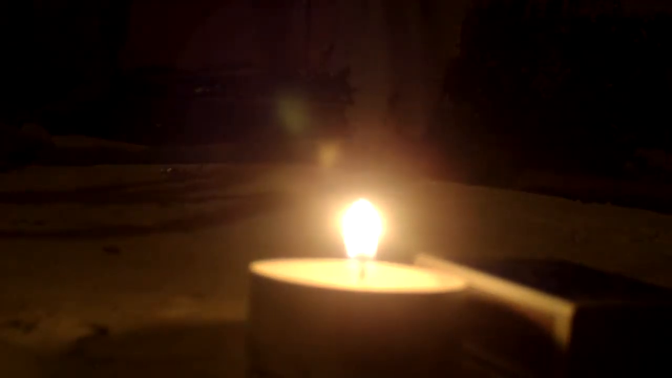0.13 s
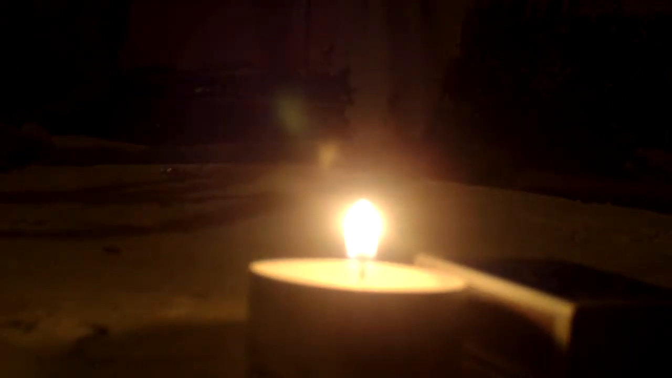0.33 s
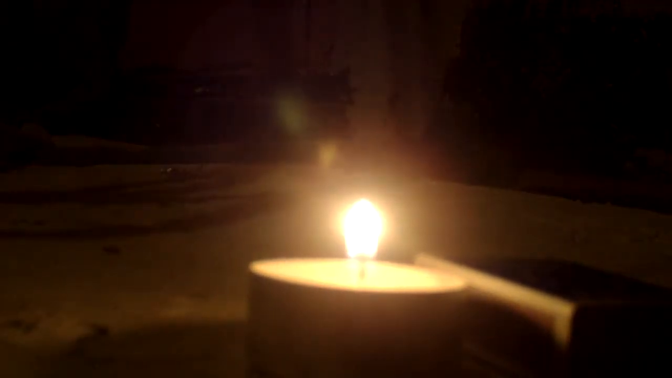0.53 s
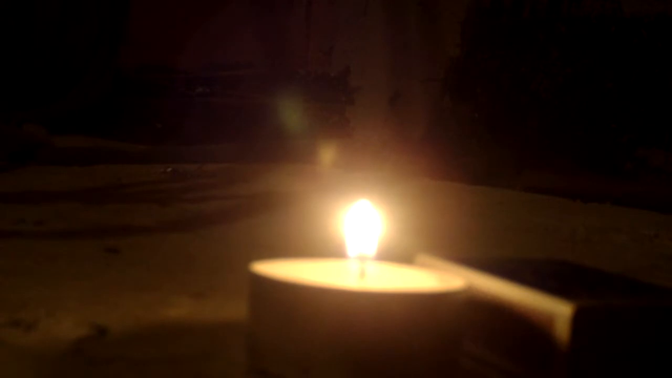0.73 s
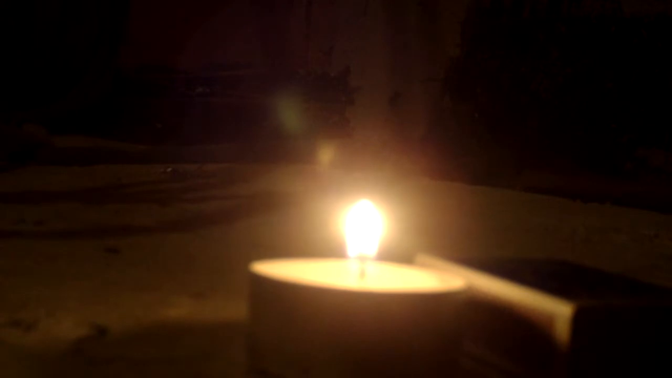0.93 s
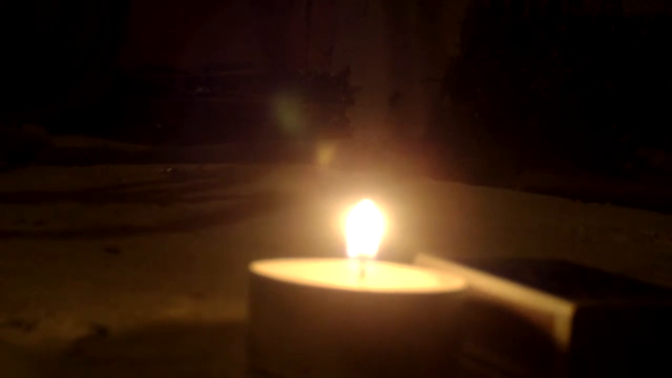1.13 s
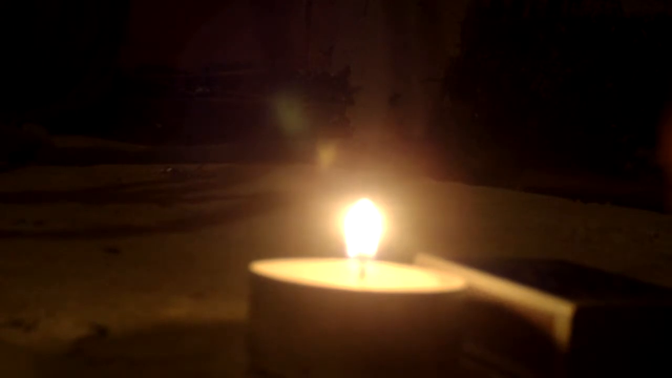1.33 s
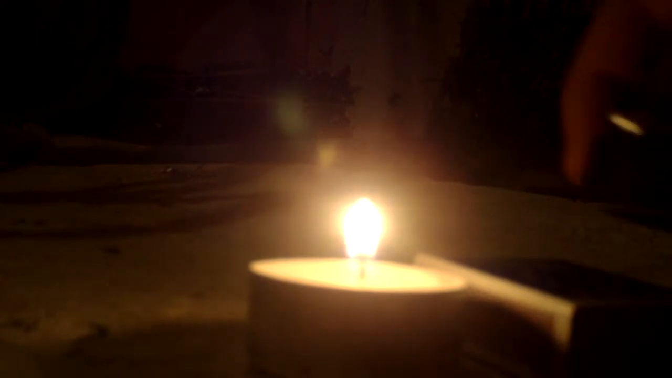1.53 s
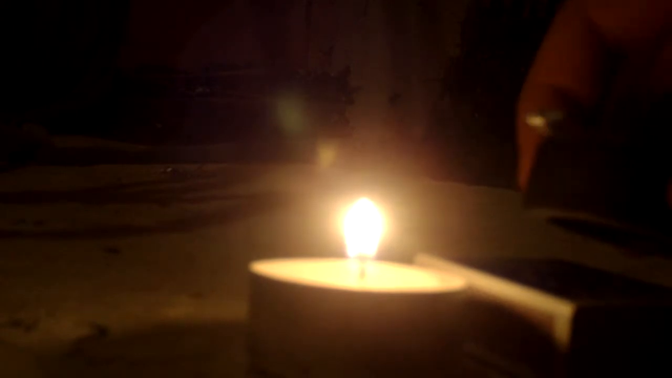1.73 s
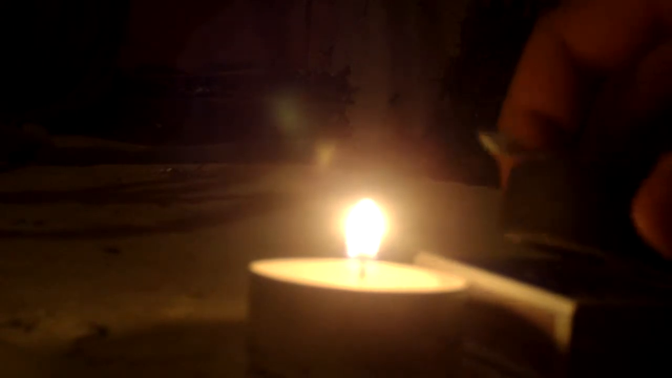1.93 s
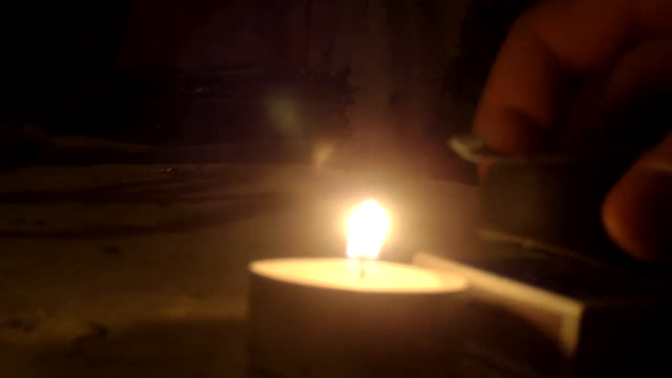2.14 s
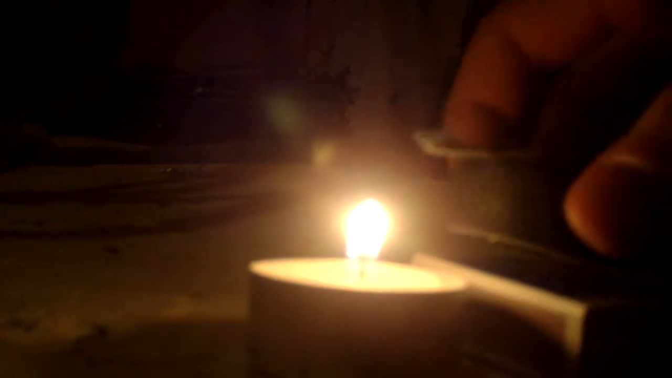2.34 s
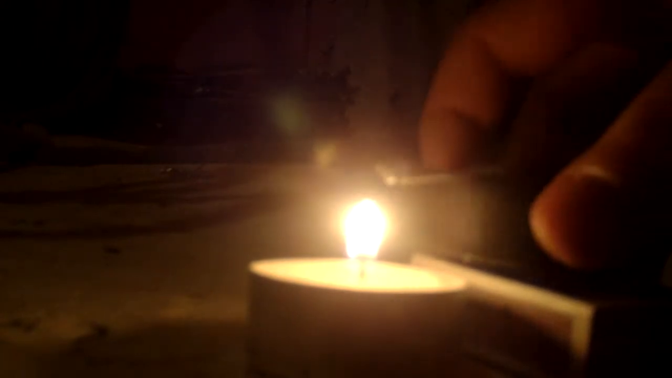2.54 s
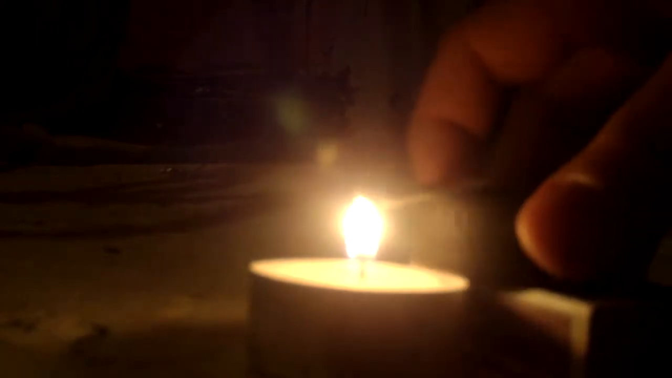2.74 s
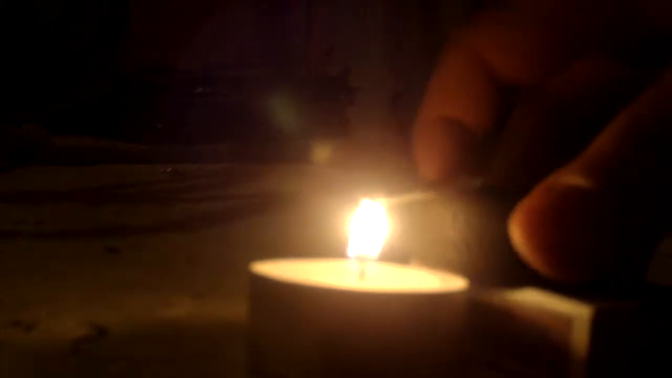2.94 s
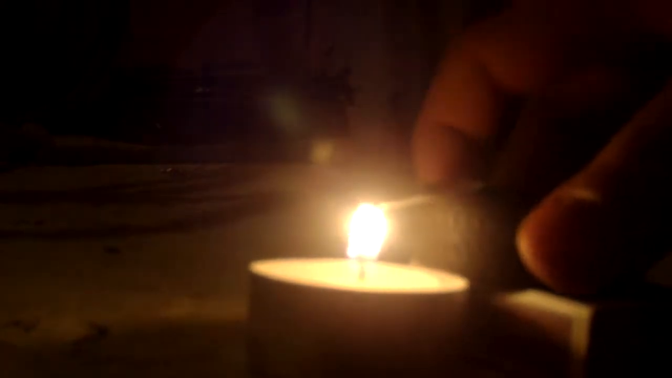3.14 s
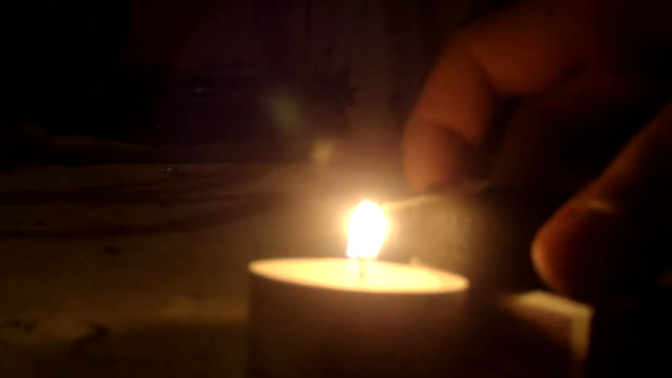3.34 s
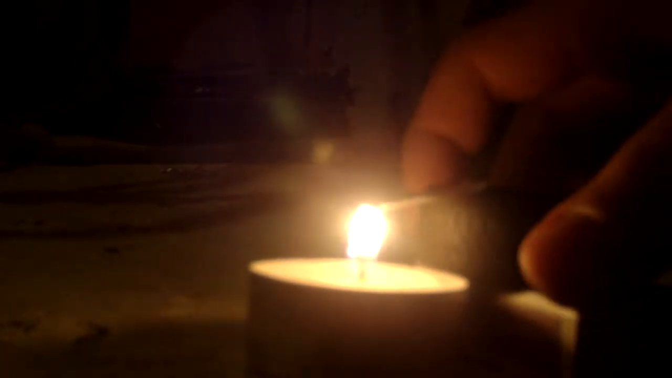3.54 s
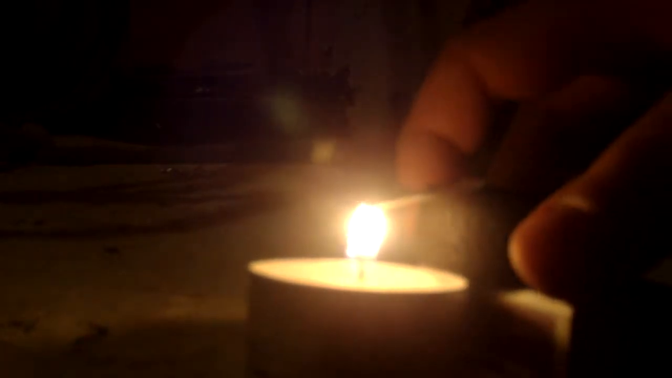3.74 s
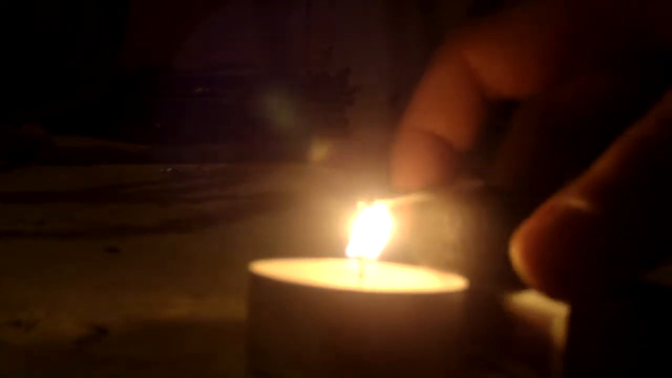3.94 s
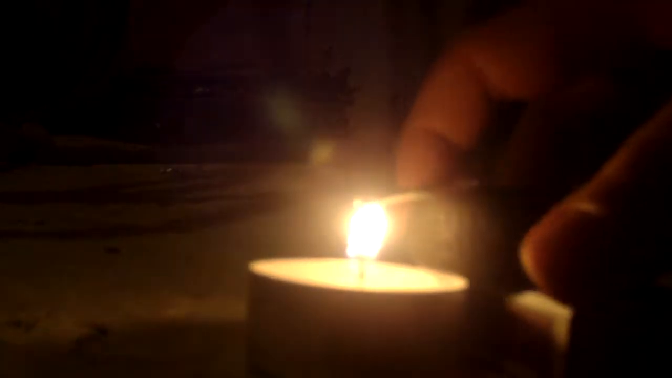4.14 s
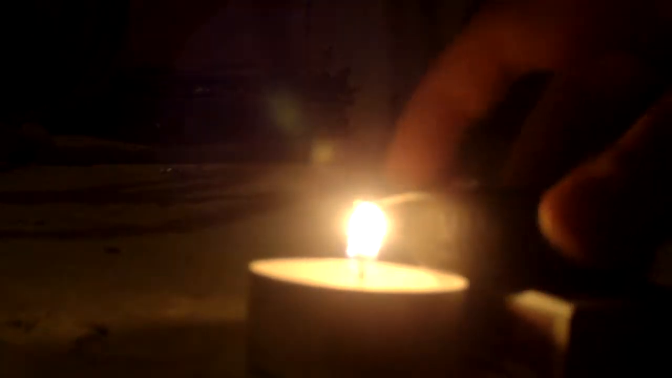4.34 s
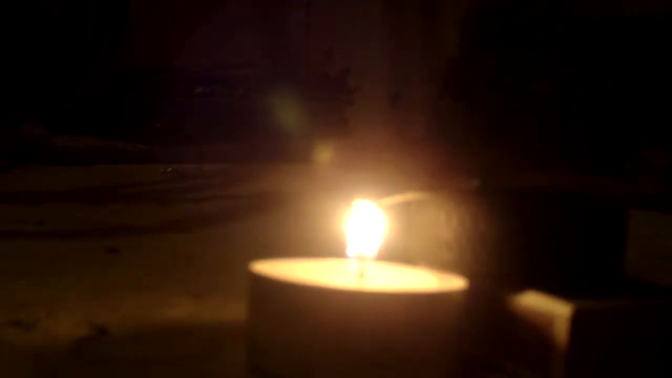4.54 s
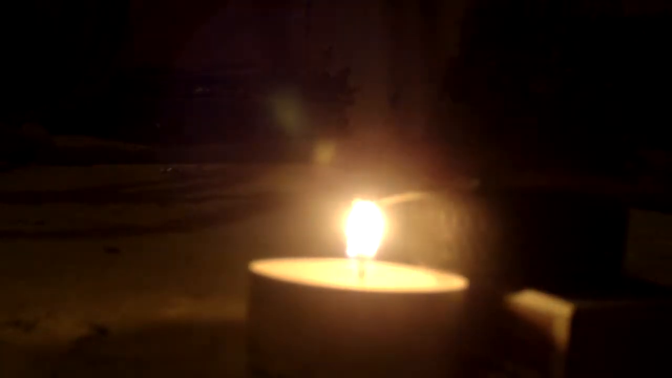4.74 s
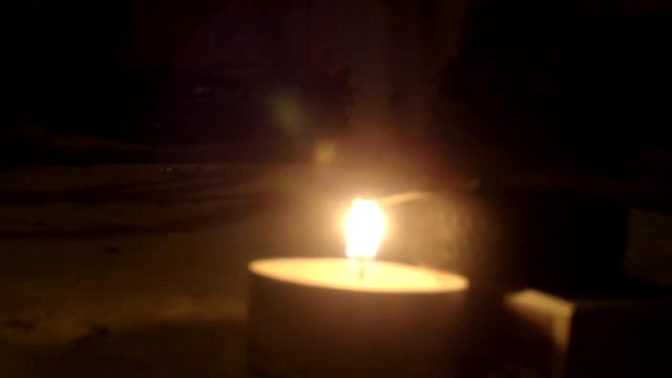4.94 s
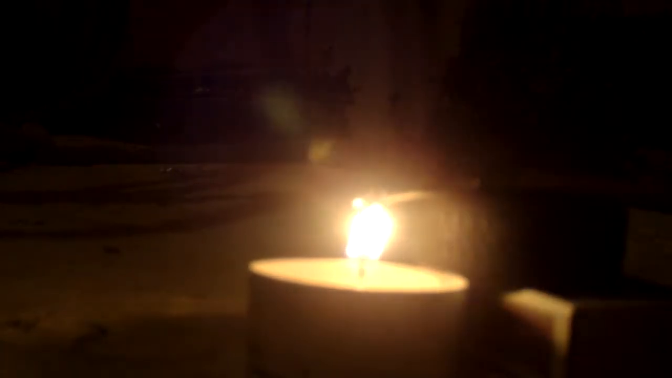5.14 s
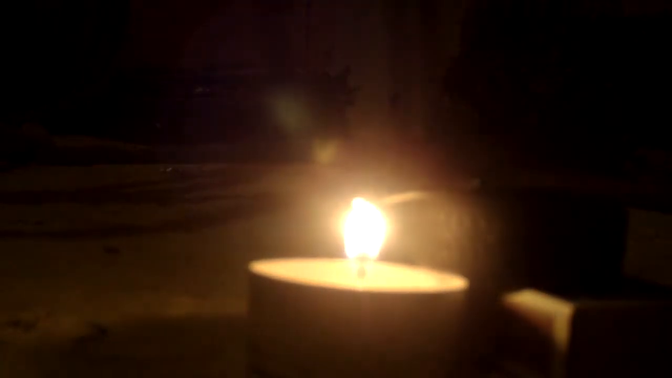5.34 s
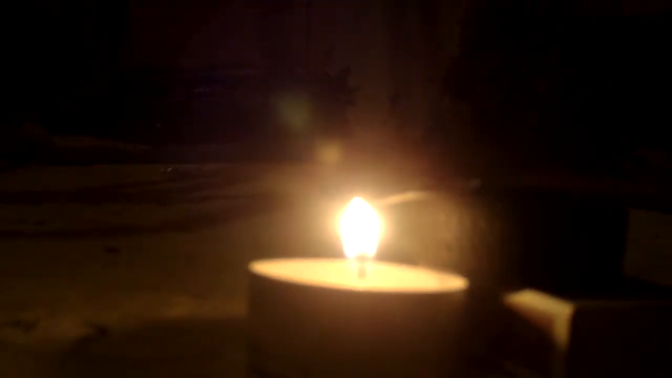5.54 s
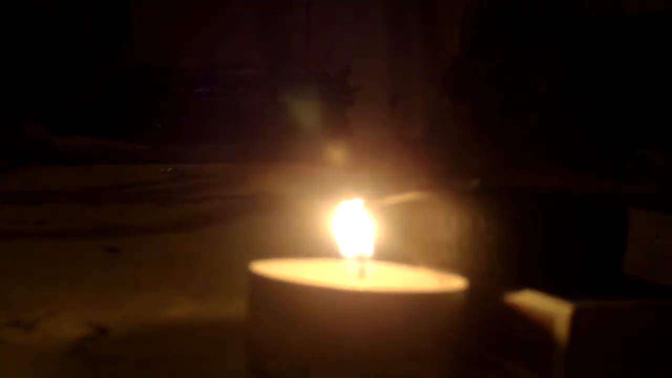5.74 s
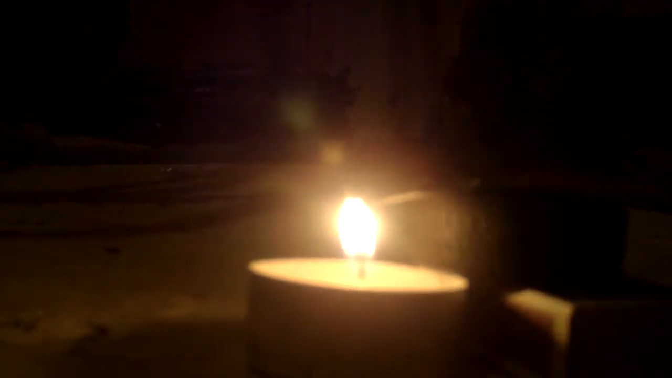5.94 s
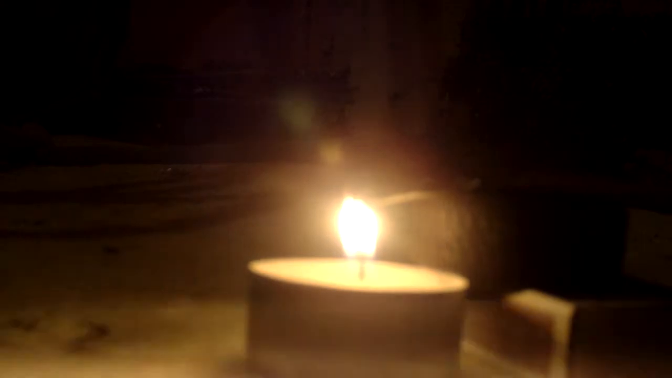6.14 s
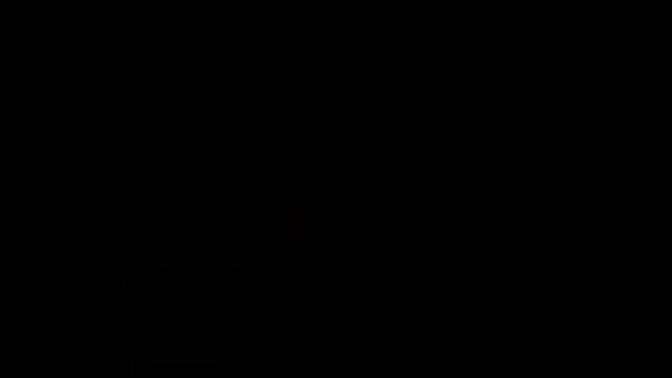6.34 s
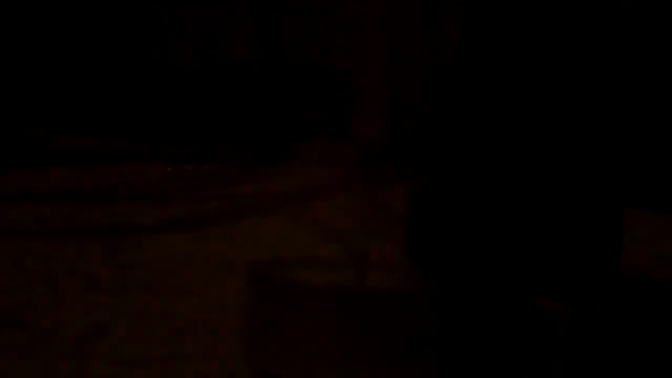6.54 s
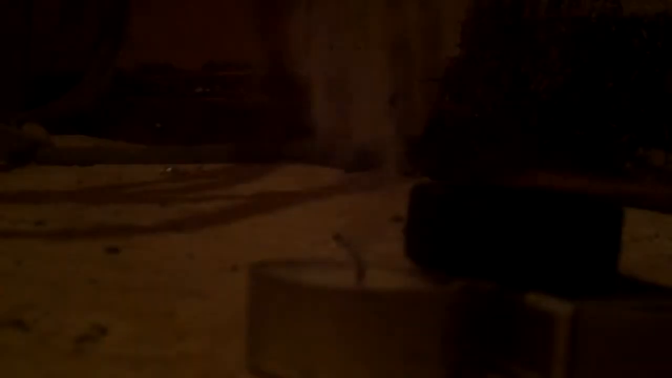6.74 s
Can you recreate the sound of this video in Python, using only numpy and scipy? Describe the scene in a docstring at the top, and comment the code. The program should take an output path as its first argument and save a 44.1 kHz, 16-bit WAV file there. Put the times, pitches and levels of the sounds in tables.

```python
"""In a small room, a match firecracker on a small box is pushed across a table into a candle flame.
Fingers rustle and tick, and the box scrapes by stick-slip friction. Someone backs away with swishing
clothes, and a few knocks excite the modes of wooden furniture and floor. Feet shuffle, then the
firecracker bursts with a bang that overloads the microphone; grit patters down. Beneath it all lie
room rumble, hiss, two draughts and a faint motor hum."""
import sys
import numpy as np
from scipy import signal
from scipy.io import wavfile
from scipy.ndimage import uniform_filter1d

SR = 44100
rng = np.random.default_rng(int(sys.argv[2]) if len(sys.argv) > 2 else 0)


def generate_wav(sig):
    """Save sig (samples, or channels by samples) to the path in sys.argv[1] as 16-bit PCM at SR."""
    pcm = np.round(np.clip(np.atleast_2d(sig).T, -1, 1) * 32767).astype(np.int16)
    wavfile.write(sys.argv[1], SR, pcm)


N = 303400

# Wall echoes of the bang: (frequency [Hz], decay by 60 dB [s])
ECHO_T60 = [(100, 0.16), (1000, 0.18), (2200, 0.2), (5000, .18), (8000, 0.14), (15000, 0.12)]
# Fingers and sleeve brushing: (peak time [s], duration [s], level [dB], tilt [dB/octave])
RUSTLES = [(0.254, 0.027, -50.5, -3.5), (0.331, 0.064, -48.5, -3), (0.769, .1, -60.5, -3.5),
           (1.031, .015, -42, -1.5), (1.069, .033, -44, -1), (1.165, .026, -50, -2), (1.261, .155, -47, -2),
           (1.363, .076, -43, 0), (2.247, .075, -55, 0), (3.702, 0.098, -48.5, .8),
           (3.84, .086, -48.5, 1.2), (4.398, 0.15, -62, -0.5), (4.566, 0.027, -48, 3),
           (5.091, .2, -47.5, 3), (5.168, 0.025, -27.5, -0.5)]
# The box gliding over the table: (time [s], level [dB])
SLIDE_ENVELOPE = [(2.31, -69), (2.42, -49.5), (2.48, -59), (2.51, -50.5), (2.56, -58.5), (2.65, -44.5),
                  (2.685, -51.5), (2.77, -53), (2.85, -74)]
# Nudges of the box: (peak time [s], duration [s], level [dB], spacing of after-slips [s])
NUDGES = [(2.178, 0.013, -52, 0.066), (2.889, .07, -56, .08), (2.979, 0.098, -52.5, 0.096),
          (3.126, 0.067, -51, .09), (3.311, 0.027, -52.5, 0.059), (3.574, .07, -60, 0.13),
          (4.004, .017, -46.5, .103), (4.034, .06, -48, .12)]
# Resonances of the box: (frequency [Hz], width [Hz], level [dB])
BOX_MODES = [(840, 410, -6), (1504, 500, 2), (2330, 610, -7.5), (4260, 1560, 0), (6620, 530, -2),
             (7550, 1900, -0.5), (9900, 870, -11), (11400, 700, -10)]
# Sharp little ticks: (time [s], peak level [dB], tilt [dB/octave])
TICKS = [(.3896, -35, 3), (.7359, -32, 7), (1.1625, -31.5, -1), (1.2006, -27, 0), (2.253, -26, 9.5),
         (2.507, -34, 2), (2.5852, -24.5, -2.5), (2.589, -20.5, 9), (2.9554, -31, 8.5), (3.002, -33, -4.5),
         (3.1104, -32.5, -7), (3.3078, -35, -5.5), (3.6254, -38, 0), (4.0638, -40, 1), (4.1028, -39, 2),
         (4.6153, -37, 0.5), (4.7338, -25, -5), (4.8942, -27.5, 1), (5.018, -25, -5.5), (5.0827, -24.5, 3),
         (5.1123, -23, -4.5), (5.684, -35.5, -2), (5.724, -36, -1), (6.633, -26, 0.5), (6.7424, -28, 7.5)]
# Clothes in two sweeping movements: (time [s], level [dB])
SWISH_ENVELOPE = [(4.85, -58), (4.898, -44), (4.925, -37.5), (4.974, -32), (4.992, -51), (5.19, -51.5),
                  (5.27, -59.5), (5.295, -50.5), (5.34, -67), (5.415, -58.5), (5.47, -45), (5.493, -42.5),
                  (5.506, -26.5), (5.528, -51), (5.6, -65)]
# Scuffs of feet and clothes: (peak time [s], duration [s], level [dB], tilt [dB/octave])
SCUFFS = [(5.414, 0.049, -49, 4), (5.817, .042, -38, -4), (5.868, 0.084, -53, 1.5), (5.924, .05, -48.5, 2),
          (5.993, 0.062, -45.5, .5)]
# Short shuffling scuffs of feet just before the bang: (peak time [s], duration [s], level [dB])
SHUFFLES = [(6.08, 0.07, -52), (6.12, 0.071, -45.5), (6.263, .058, -49.5)]
# Groans of pushed furniture: (peak time [s], duration [s], level [dB])
GROANS = [(.63, .09, -67.5), (5.2, .2, -59.5), (5.53, .13, -45.5)]
# Resonances of the groaning furniture: (frequency [Hz], width [Hz], level [dB])
GROAN_MODES = [(755, 110, -1.5), (1038, 69, 6.5), (1290, 64, -4.5), (1730, 100, -14)]
# Bumps on furniture and floor: (time [s], ring gain [dB], pitch [ratio], thud gain [dB])
KNOCKS = [(5.41, -39.5, 1.02, -33), (5.506, -38.5, 1.14, -39), (5.7987, -18.5, 1.03, -32),
          (5.855, -49, 1.9, -31.5), (5.983, -52, 0.73, -35.5), (6.12, -46, 1.2, -40.5),
          (6.26, -52, 1.13, -49), (6.857, -55, 1.02, -46.5)]
# Modes of the struck wood: (frequency [Hz], level [dB], decay by 60 dB [s])
WOOD_MODES = [(392, -19.5, .14), (766, -33, 0.11), (1021, -4, 0.13), (1123, -16, 0.062), (1270, -19, 0.086),
              (1470, -22, 0.078), (1710, -20, .073), (2200, -23.5, .1), (2525, -24.5, 0.11),
              (3203, -27, 0.081)]
# Air brushing the microphone: (peak time [s], duration [s], level [dB])
DRAUGHTS = [(3.25, .73, -54.5), (5.12, .3, -44.5)]

# Spectral envelopes of the sources: (frequency [Hz], relative level [dB])
ECHO_SPECTRUM = [(40, -16.5), (200, -10), (480, -5), (900, -7.5), (1600, -8), (2100, -14.5), (2800, -10.5),
                 (3500, -4), (5000, -1.5), (7000, 1), (8200, -6.5), (11500, -4), (15500, -19.5)]
GRIT_SPECTRUM = [(400, -14), (1500, -12.5), (4500, -7.5), (6000, -5), (7200, 2), (8500, -3), (11500, -7.5),
                 (13000, -10), (15500, -11)]
RUSTLE_SPECTRUM = [(300, -29), (600, -15), (900, -9.5), (2300, -6.5), (3400, -10.5), (5200, -4.5),
                   (6300, 3), (7300, 2.5), (7900, -3.5), (10000, -7), (11600, -5.5), (13000, -13),
                   (15500, -13)]
SLIDE_SPECTRUM = [(400, -24), (850, -3), (1250, -14.5), (2700, -7), (3400, -13), (5000, -6.5), (6000, -10),
                  (7500, 1), (9300, -7.5), (11000, -13.5), (12300, -20), (15500, -24)]
TICK_SPECTRUM = [(300, -30), (1200, -8.5), (3000, -6.5), (5500, -2.5), (7000, 6), (8500, 0), (11500, -8),
                 (15000, -17)]
CLOTH_SPECTRUM = [(250, -22), (550, -10), (900, 1.5), (1700, -0.5), (2200, -4), (3200, -4.5), (4700, -3),
                  (7000, -5), (8500, -12.5), (11500, -15.5), (15500, -26)]
SHUFFLE_SPECTRUM = [(250, -25.5), (550, 5), (1100, -4.5), (1900, -12), (4200, -4), (6500, 0.5), (9000, -7),
                    (12000, -10.5), (15500, -20)]
THUD_SPECTRUM = [(30, -5.5), (70, 2), (140, -1.5), (330, -9.5), (700, -12), (1500, -21.5), (5000, -49)]
DRAUGHT_SPECTRUM = [(20, -3.5), (55, 7), (100, -10.5), (200, -20), (500, -21), (2000, -77)]
RUMBLE_AND_HISS_SPECTRUM = [(12, -34.5), (20, 1), (98, -9), (140, -15), (175, -16.5), (297, -23),
                            (612, -30.5), (665, -29), (765, -33), (855, -31.5), (1100, -34), (1230, -35),
                            (2600, -39), (15400, -42.5)]


def bang(start_s=6.4057, blast_db=4, blast_decay_s=0.0095, echo_db=9, late_db=-40, late_t60=0.78):
    """Sudden expansion radiates a low blast; absorption damps its wall echoes, fastest at the top."""
    out, t = np.zeros(N), seconds(.6)
    direct, walls = rng.standard_normal((2, len(t)))
    blast_band = signal.butter(2, [400, 1600], "bandpass", fs=SR, output="sos")
    blast = amp(blast_db) * unit_rms(signal.sosfilt(blast_band, direct)) * np.exp(-t / blast_decay_s)
    hz, age, bands = signal.stft(walls, SR, nperseg=256)
    t60 = np.interp(hz, *np.transpose(ECHO_T60))[:, None]
    decay = amp(echo_db - 60 * age / t60) + amp(late_db - 60 * age / late_t60)
    echoes = colour(signal.istft(bands * decay, SR)[1][:len(t)], ECHO_SPECTRUM)
    suction = -2.8 * np.exp(-t / 0.011)
    recovery = 0.26 * np.exp(-t / 0.084)  # the microphone sheds the pressure swing slowly
    add(out, start_s, blast + echoes + suction + recovery)
    return out


def grit(start_s=6.44, rise_s=0.12, level_db=-40.5, fall_db_per_s=56.5):
    """Random impacts of burnt crumbs on the table superpose into a fading patter."""
    age = np.arange(N) / SR - start_s
    envelope = np.clip(age / rise_s, 0, 1) * amp(level_db - fall_db_per_s * np.maximum(age - rise_s, 0))
    patter = grains(N, per_s=1600, spread_db=5) + .5 * rng.standard_normal(N)
    return colour(envelope * patter, GRIT_SPECTRUM)


def fingers():
    """Sliding friction of fingers and sleeve radiates brief rustles."""
    return sum(bursts([stroke], RUSTLE_SPECTRUM, per_s=5000, spread_db=2.5, hiss=0.65,
                      edge_db=10.5, rise_share=.58, tilt_db=tilt_db) for *stroke, tilt_db in RUSTLES)


def box(after_slip_s=0.05, step_db=-8):
    """Stick-slip friction: the box glides, and each nudge and two weaker slips drive its resonances."""
    slide = glide(SLIDE_ENVELOPE, SLIDE_SPECTRUM, per_s=2300, spread_db=4, hiss=0.64)
    strokes = []
    for time, length, db, gap in NUDGES:
        strokes.append((time, length, db))
        strokes += [(time + k * gap, after_slip_s, db + k * step_db) for k in (1, 2)]
    return slide + bursts(strokes, resonances(BOX_MODES, skirt=1.27), per_s=1400, spread_db=3,
                          hiss=0.22, edge_db=12.5, rise_share=.45, tilt_db=-1.5)


def ticks(decay_s=0.0006):
    """An impulse with a millisecond of chatter is so brief that its spectrum is broad."""
    out, t = np.zeros(N), seconds(0.041)
    for time, db, tilt_db in TICKS:
        impulse = 0.14 * (t == 0)
        chatter = .5 * rng.standard_normal(len(t)) * np.exp(-t / decay_s)
        snap = colour(impulse + chatter, TICK_SPECTRUM, tilt_db)
        add(out, time, amp(db) * snap / abs(snap).max())
    return out


def clothes_and_feet():
    """Dense frictional slips merge into swishes and scuffs as someone backs away."""
    swishes = glide(SWISH_ENVELOPE, CLOTH_SPECTRUM, per_s=7000, spread_db=2, hiss=0.97)
    scuffs = sum(bursts([stroke], CLOTH_SPECTRUM, per_s=7000, spread_db=4, hiss=1.22,
                        edge_db=24, rise_share=.3, tilt_db=tilt_db) for *stroke, tilt_db in SCUFFS)
    return swishes + scuffs


def foot_shuffles():
    """Sliding friction of feet makes short shuffling scuffs just before the bang."""
    return bursts(SHUFFLES, SHUFFLE_SPECTRUM, per_s=6400, spread_db=1, hiss=1.3,
                  edge_db=15, rise_share=.42)


def furniture_groans():
    """Forced vibration: sparse slips drive the narrow resonances of pushed furniture."""
    return bursts(GROANS, resonances(GROAN_MODES), per_s=780, spread_db=5, hiss=0.35,
                  edge_db=15, rise_share=.31)


def knocks(thud_t60=0.098, thud_rise_s=0.0021, scatter_s=0.011):
    """Free vibration: struck wood rings in damped modes over a dull thud; their phases soon scatter."""
    out, t = np.zeros(N), seconds(.3)
    scatter_rad = 1 - np.exp(-t / scatter_s)
    thud_envelope = amp(-60 * t / thud_t60) * (1 - np.exp(-t / thud_rise_s))
    for time, ring_db, pitch, thud_db in KNOCKS:
        ring = np.zeros(len(t))
        for hz, db, t60 in WOOD_MODES:
            phase = 2 * np.pi * hz * pitch * t + scatter_rad * wander(len(t), span=300)
            ring += amp(db - 60 * t / t60) * np.sin(phase)
        thud = colour(rng.standard_normal(len(t)) * thud_envelope, THUD_SPECTRUM)
        add(out, time, amp(ring_db) * ring + amp(thud_db) * thud)
    return out


def draughts():
    """Pressure fluctuations of air brushing the microphone make a low rumble."""
    return bursts(DRAUGHTS, DRAUGHT_SPECTRUM, per_s=300, spread_db=1, hiss=1.8,
                  edge_db=13, rise_share=.43)


def motor_hum(on_s=2.4, off_s=6.45, rise_s=0.36, fall_s=0.72, level_db=-66.5,
              start_hz=432, steady_hz=369.5, settle_s=0.52, waver_hz=4):
    """Harmonic orders of a motor: a tone and two weaker ones below sink together, then hold, wavering."""
    t = np.arange(N) / SR
    hz = steady_hz + (start_hz - steady_hz) * np.exp(-((t - on_s) / settle_s) ** 2)
    fade = np.clip(np.minimum((t - on_s) / rise_s, (off_s - t) / fall_s), 0, 1)
    phase = 2 * np.pi * np.cumsum(hz + waver_hz * wander(N, span=2000)) / SR
    lower_orders = np.sin(phase / 3) + np.sin(2 * phase / 3)
    return amp(level_db) * fade * np.sqrt(2) * (np.sin(phase) + amp(-6) * lower_orders)


def noise_floor(level_db=-50.5):
    """Room rumble and microphone hiss form a stationary noise."""
    return amp(level_db) * unit_rms(colour(rng.standard_normal(N), RUMBLE_AND_HISS_SPECTRUM, size=16384))


def room(x, t60=.22, gap_s=.003):
    """Reverberation: dense reflections decay exponentially in a small furnished room."""
    t = seconds(0.43)
    tail = grains(len(t), per_s=4200, spread_db=0.5) * amp(-60 * t / t60) * (t > gap_s)
    return signal.fftconvolve(x, tail / np.linalg.norm(tail))[:N]


def bursts(events, spectrum, per_s, spread_db, hiss, edge_db, rise_share, tilt_db=0):
    """Source and filter: each burst of grainy noise swells by edge_db, fades again and is coloured."""
    out = np.zeros(N)
    for peak_s, length, db in events:
        rise_s = rise_share * length
        t = seconds(length) - rise_s
        from_peak = np.where(t < 0, t / rise_s, t / (length - rise_s))
        envelope = amp(db - edge_db * from_peak ** 2) * signal.windows.tukey(len(t), .1)
        source = envelope * slips(len(t), per_s, spread_db, hiss)
        add(out, peak_s - rise_s, colour(np.pad(source, (0, 2048)), spectrum, tilt_db))
    return out


def glide(levels, spectrum, per_s, spread_db, hiss):
    """Amplitude modulation: unbroken friction noise follows a level curve."""
    db = np.interp(np.arange(N) / SR, *np.transpose(levels), left=-np.inf, right=-np.inf)
    return colour(amp(db) * slips(N, per_s, spread_db, hiss), spectrum)


def slips(count, per_s, spread_db, hiss, catch_db=2.63, catch_hz=110):
    """Stick-slip noise: tiny slips over a smooth hiss, uneven as the surfaces catch and let go."""
    samples = np.arange(count)
    grip = np.interp(samples * catch_hz / SR, samples, rng.standard_normal(count))
    texture = grains(count, per_s, spread_db) + hiss * rng.standard_normal(count)
    return unit_rms(texture * amp(catch_db * grip))


def grains(count, per_s, spread_db):
    """Shot noise: independent tiny impulses, a few larger than the rest."""
    sizes = amp(spread_db * np.minimum(rng.exponential(1, count), 4))
    return unit_rms(sizes * rng.choice([-1, 1], count) * (rng.random(count) < per_s / SR))


def resonances(modes, skirt=1):
    """Modal peaks sum to a body's spectrum; a steeper skirt sounds hollower."""
    hz = np.geomspace(100, 16000, 400)
    gain = sum(amp(db) / (1 + (2 * (hz - centre) / width) ** 2) ** skirt for centre, width, db in modes)
    return np.column_stack([hz, 20 * np.log10(gain)])


def colour(x, spectrum, tilt_db=0, size=4096):
    """Minimum-phase filtering at unit energy, the spectrum tilted by tilt_db per octave."""
    octave = np.log2(abs(np.fft.fftfreq(size, 1 / SR)) + 10)
    hz, db = np.transpose(spectrum)
    gain_db = np.maximum(np.interp(octave, np.log2(hz + 1), db), -100) + tilt_db * octave
    log_response = np.conj(signal.hilbert(np.log(amp(gain_db))))
    taps = np.fft.ifft(np.exp(log_response)).real[:size // 2]
    return signal.fftconvolve(x, taps / np.linalg.norm(taps))[:len(x)]


def wander(count, span):
    """Averaging noise over span samples leaves a slow fluctuation."""
    return unit_rms(uniform_filter1d(rng.standard_normal(count), size=span))


def amp(db):
    """Decibels to amplitude ratio."""
    return 10 ** (np.asarray(db) / 20)


def unit_rms(x):
    """Normalisation to unit power."""
    return x / np.sqrt(np.mean(x ** 2) + 1e-20)


def add(mix, start_s, sound):
    """Superposition of a sound on the mix."""
    part = mix[round(start_s * SR):][:len(sound)]
    part += sound[:len(part)]


def seconds(length):
    """A time axis from zero."""
    return np.arange(int(length * SR)) / SR


def scene(near_wet_db=-15, far_wet_db=-10):
    """Direct and reverberant sound superpose; a larger reverberant share sounds farther off."""
    near = fingers() + box() + ticks() + grit() + foot_shuffles()
    far = clothes_and_feet() + furniture_groans() + knocks()
    background = motor_hum() + noise_floor() + draughts()
    reverberation = room(amp(near_wet_db) * near + amp(far_wet_db) * far)
    return (bang() + near + far + reverberation + background)[None]


def record(dry, cutoff_hz=15900):
    """Saturation: the input clips hard at full scale, then a low-pass filter limits the band."""
    clipped = np.clip(dry, -1, 1)
    lowpass = signal.firwin(511, cutoff_hz, window=("kaiser", 9), fs=SR)
    return signal.oaconvolve(clipped, lowpass[None], "same")


dry = scene()
out = record(dry)
generate_wav(out)
```